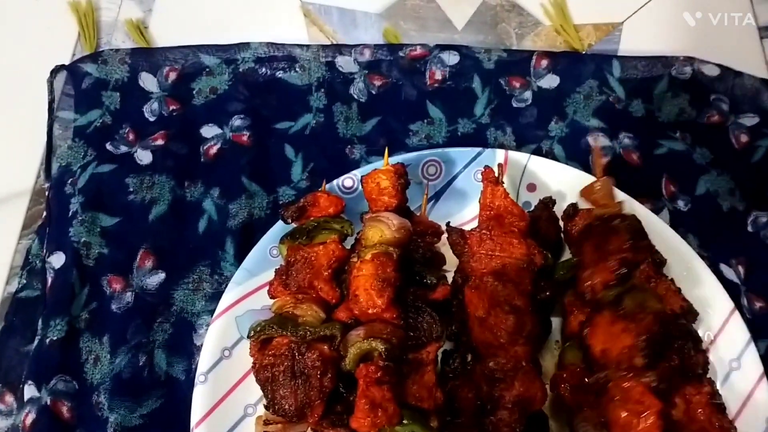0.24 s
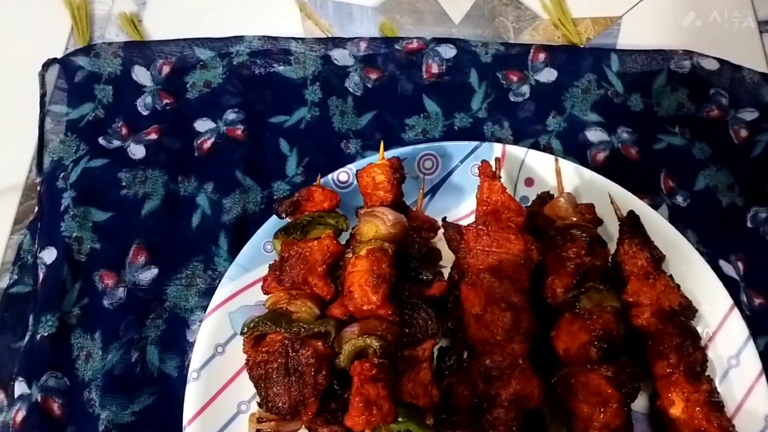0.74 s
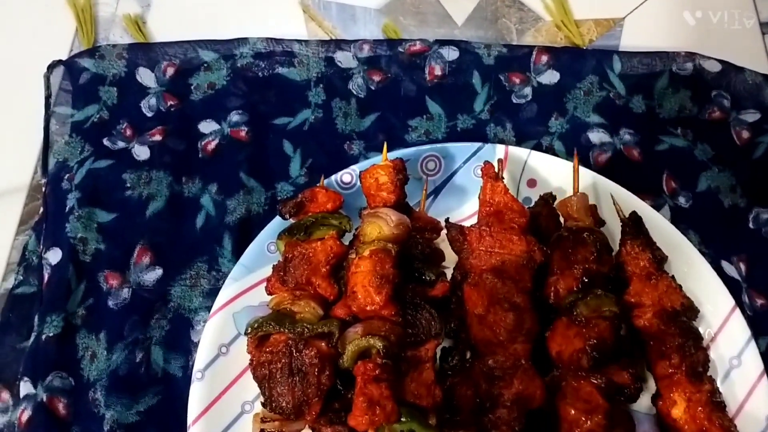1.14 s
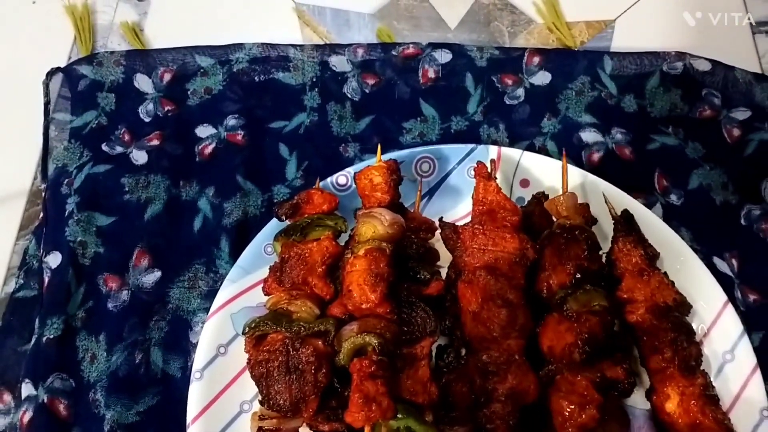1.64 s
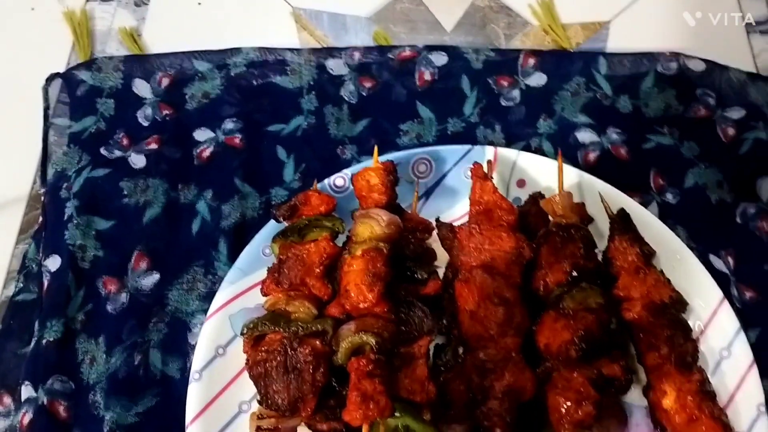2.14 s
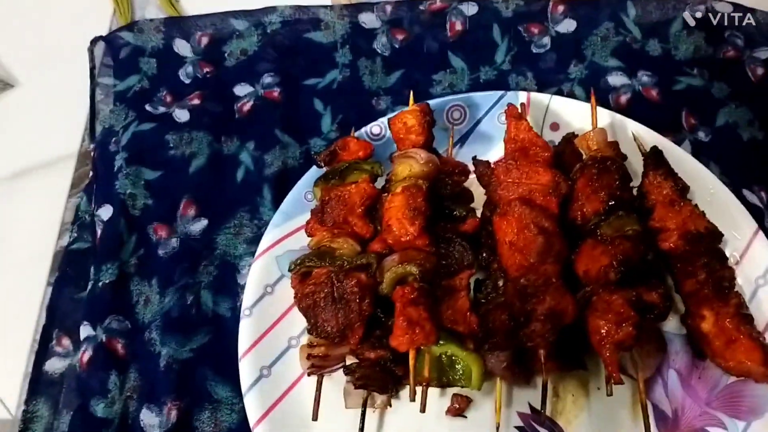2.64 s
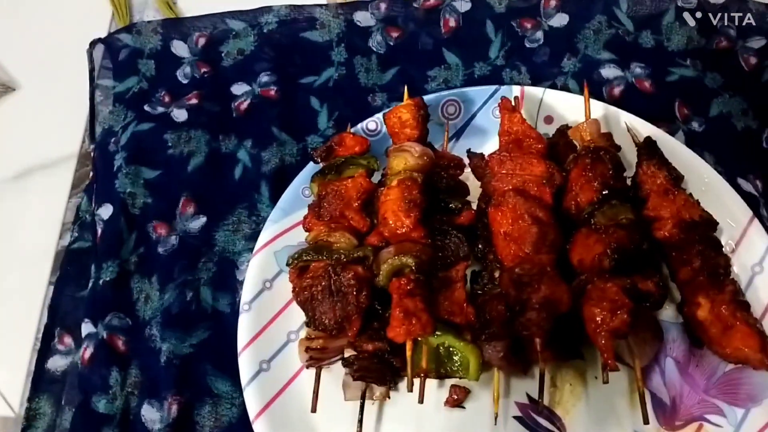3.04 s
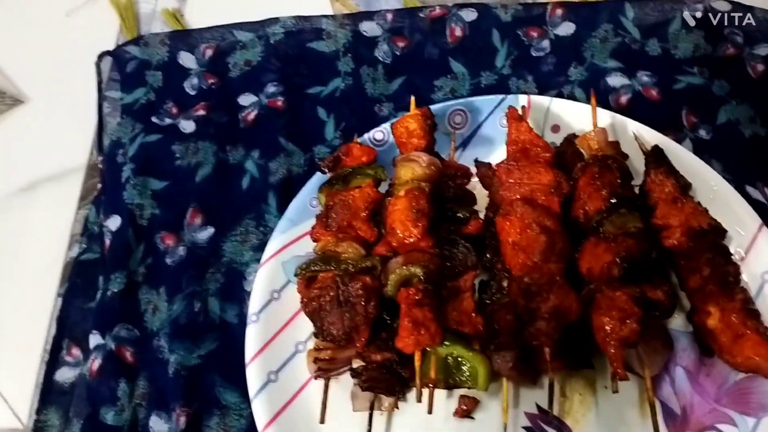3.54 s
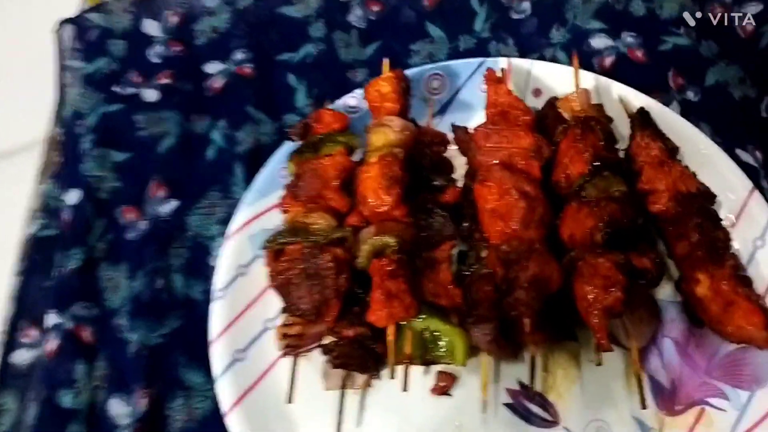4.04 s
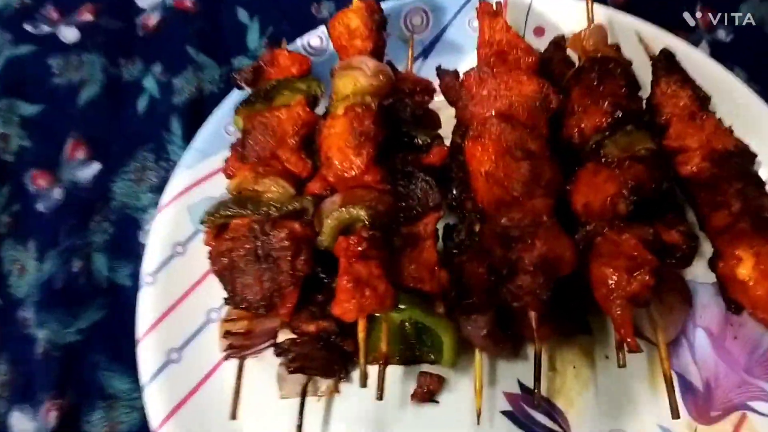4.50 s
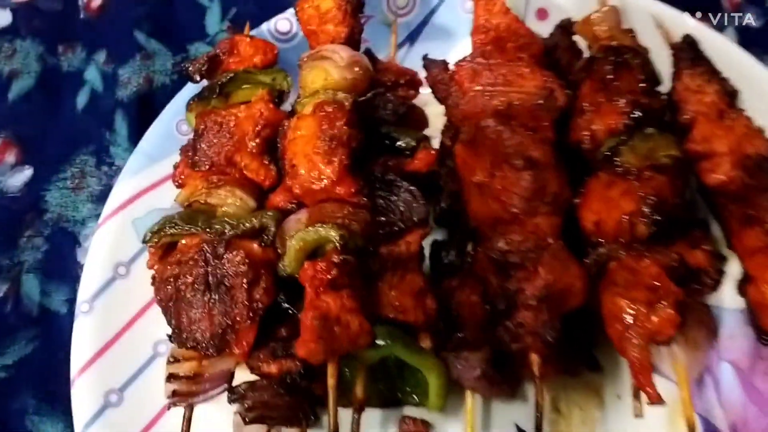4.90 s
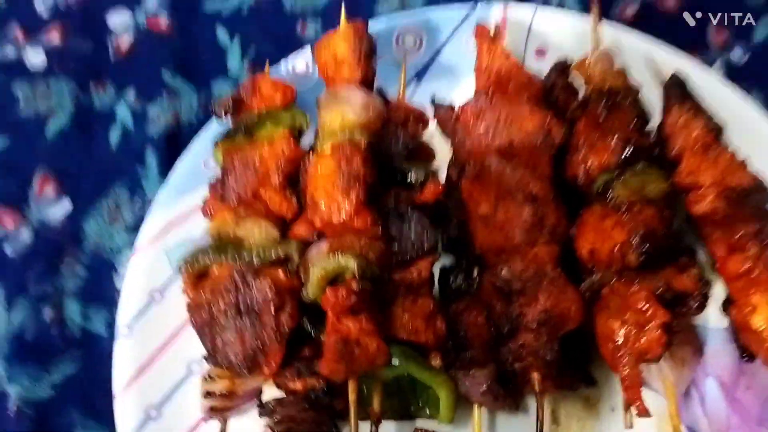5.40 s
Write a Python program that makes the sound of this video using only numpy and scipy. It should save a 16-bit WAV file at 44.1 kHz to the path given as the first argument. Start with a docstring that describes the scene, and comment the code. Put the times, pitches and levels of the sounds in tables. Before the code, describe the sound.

For about 5.7 seconds an electric fan runs in a room. Its motor gives a steady hum of many close tones, beating about thirteen times a second, with a broad soft rush of air and a faint treble hiss. The draught buffets the microphone in short, low, irregular thumps: light at first, hard near 0.9, 1.2 and 1.6 seconds, again around 2.2 and 2.7, fluttering near 3.1, then a dense, strongest rumble from 3.75 to 4.3. Afterwards it is calmer, with one weaker puff near 4.65. Faint bright ticks with short dying tails are scattered throughout, clearer near 1.8, 2.3, 3.75 and 4.15, over even fainter ticking with each turn. A sharp, tiny double snap comes at 1.5 seconds. From about 4.7 the hum recedes markedly, while the air softens only slightly. The plate of skewered food makes no audible sizzle.

```python
"""An electric fan runs in a room: its motor hums as a sum of sines that beat into one throb per shaft turn.
Its blades push a broad rush of air and a treble hiss, both noises of shaped spectrum with fluctuating level.
Its draught buffets the microphone in low, irregular puffs, made of short sine swings and low noise.
Faint bright ticks, bursts of treble noise, die away nearby, and one sharp double snap is heard."""
import sys
import numpy as np
from scipy import signal
from scipy.fft import rfft, irfft
from scipy.io import wavfile
from scipy.ndimage import uniform_filter1d

SR = 44100
rng = np.random.default_rng(int(sys.argv[2]) if len(sys.argv) > 2 else 0)


def voltage_ratio(level):
    """Linear amplitude factor for a level in decibels (scalar or array-like)."""
    return 10 ** (np.asarray(level, float) / 20)


def store_pcm(level_fs):
    """Save levels as 16-bit WAV."""
    pcm = np.round(np.clip(level_fs, -1, 1) * 32767).astype(np.int16)
    wavfile.write(sys.argv[1], SR, np.atleast_2d(pcm).T)


N = 249586

# Levels in the tables hold before the random fluctuations and filters; spectra are relative, per Hz.
# Motor tones, {multiple of twice the mains: [(shaft order, rms level/dB)]};
# pitch = order * shaft frequency + multiple * twice the mains frequency
MOTOR_TONES = {-1: [(90, -58)], 0: [(41, -62), (43, -57), (45, -52), (47, -60), (51, -55), (53, -53),
               (54, -53), (56, -60), (89, -53), (90, -59), (91, -59), (92, -60), (94, -61)], 1: [(44, -53),
               (45, -43), (46, -46), (47, -50), (49, -55), (88, -61), (89, -53), (90, -55), (91, -62),
               (93, -61)], 2: [(41, -59), (42, -56), (43, -53), (44, -56), (45, -49), (47, -62), (89, -59),
               (90, -61), (91, -59), (92, -60)], 3: [(44, -54), (45, -62), (48, -59)], 4: [(46, -62),
               (92, -61)]}
# The hum fades as the microphone turns away: (t/s, level change/dB)
HUM_FADE = [(0, -0.5), (1, -1), (2, 1.5), (3.7, -0.5), (4.7, -0.5), (4.95, -3.5), (5.66, -10.5)]
# How much of the fan's air noise reaches the microphone: (t/s, rush level/dB, hiss level/dB)
FAN_AIR_LEVELS = [(0.0, -35.5, -53.5), (0.36, -36.5, -54), (2.82, -36, -53), (3.62, -36.5, -54.5),
                  (3.97, -34.5, -53.5), (4.44, -36, -55), (5.23, -38, -56.5), (5.66, -37.5, -58)]
# Spectrum of the air rush and room noise: (f/Hz, level/dB)
RUSH_SPECTRUM = [(35, -1.5), (90, -15.5), (240, -4), (450, -15), (560, -4.5), (700, -6), (810, -7),
                 (940, -6), (1090, -7.5), (1380, -7), (1440, -11), (1900, -10.5), (2750, -15.5),
                 (3300, -20), (3750, -27.5), (4200, -46), (8000, -60)]
# Spectrum of the treble hiss: (f/Hz, level/dB)
HISS_SPECTRUM = [(2000, -7), (4000, 1.5), (6300, -0.5), (7500, 3.5), (8800, -2.5), (10500, -8.5),
                 (12200, -8.5), (14000, -5.5), (15600, -1), (17000, -7.5)]
# Strength of the draught between the strong puffs: (t/s, level/dB)
GUST_LEVELS = [(0, -48), (.5, -43.5), (.68, -53), (.82, -35.5), (1.4, -46.5), (1.75, -36.5), (2.0, -39),
               (2.38, -44.5), (2.6, -34.5), (2.9, -40.5), (3.15, -26.5), (3.32, -45), (3.68, -41),
               (3.85, -36), (4.08, -34), (4.44, -51.5), (4.85, -45.5), (5.66, -49.5)]
# Strong puffs of draught: (t/s, peak level/dB, centre f/Hz, length/ms)
STRONG_PUFFS = [(0.091, -24, 188, 4.2), (0.255, -32, 123, 18), (0.343, -21.5, 145, 11.4),
                (0.445, -26, 142, 5.8), (0.759, -24, 156, 9.1), (0.799, -19.5, 149, 6.7),
                (0.878, -6.5, 201, 5.7), (0.898, -11.5, 215, 9.3), (1.069, -20, 125, 11),
                (1.233, -8.5, 150, 7.6), (1.316, -23.5, 108, 12), (1.538, -22.5, 129, 10),
                (1.59, -9, 124, 13.5), (1.656, -23, 150, 8.3), (1.811, -16.5, 149, 7.6),
                (1.85, -15.5, 137, 10), (1.875, -18.5, 159, 7.4), (1.902, -18, 120, 17),
                (2.0, -24.5, 180, 20), (2.042, -22.5, 168, 20), (2.138, -17.5, 180, 6.9),
                (2.157, -9.5, 156, 6.5), (2.218, -21.5, 159, 18), (2.481, -22, 152, 9.5),
                (2.553, -18.5, 132, 11), (2.608, -20, 180, 11), (2.665, -11, 161, 5.2),
                (2.716, -8, 153, 6.2), (2.815, -14, 148, 6.4), (2.84, -21, 131, 13), (2.999, -27, 144, 13),
                (3.049, -13, 177, 6.4), (3.1, -12.5, 215, 6.5), (3.13, -20, 150, 26), (3.178, -22, 125, 21),
                (3.071, -19.5, 150, 16), (3.255, -17.5, 136, 5.1), (3.41, -26, 116, 9.2),
                (3.556, -18.5, 147, 13), (3.758, -18, 196, 23), (3.787, -12, 274, 3.6),
                (3.808, -10, 195, 10), (3.835, -8, 186, 9.2), (3.862, -4.5, 147, 17.4),
                (3.895, -13.5, 145, 25), (3.935, -16, 157, 25), (4.039, -11, 165, 10.5),
                (4.075, -17.5, 197, 27), (4.11, -11, 165, 11), (4.195, -16.5, 171, 18),
                (4.25, -28, 131, 15), (4.284, -17, 129, 15), (4.36, -32, 127, 11), (4.648, -19, 165, 16)]
# Spectrum of the draught's noise at the microphone port: (f/Hz, level/dB)
DRAUGHT_SPECTRUM = [(15, -75), (25, -91), (88, 6), (130, 7.5), (299, -8), (384, -22.5), (515, -17),
                    (700, -66)]
# Spectrum of the ragged upper edge of a puff: (f/Hz, level/dB)
TEARING_SPECTRUM = [(100, -21), (200, 0.5), (300, 1.5), (420, -9), (520, -14.5), (650, -38)]
# Bright ticks: (t/s, nominal peak level/dB)
BRIGHT_TICKS = [(0.3536, -42), (0.43, -41), (0.5761, -43.5), (0.7357, -44), (1.1852, -45.5), (1.4356, -45),
                (1.5134, -40.5), (1.5923, -43.5), (1.812, -36), (2.2882, -39), (2.5122, -46),
                (2.811, -42.5), (3.2181, -45), (3.3712, -39.5), (3.5214, -42.5), (3.7499, -37),
                (4.149, -38), (4.2258, -43), (5.458, -41.5)]
# Spectrum of the burst of a tick: (f/Hz, level/dB)
TICK_SPECTRUM = [(3000, -35), (6500, -11), (7600, -2.5), (8500, -1), (9600, -5), (11000, -5), (12500, -19),
                 (16000, -11)]
# Spectrum of the narrower, duller tail that lingers in the room: (f/Hz, level/dB)
TAIL_SPECTRUM = [(5500, -42), (6800, -21), (7600, -4), (8500, -1), (9500, -9), (11500, -30)]
# The two clicks of the snap: (t/s, nominal peak level/dB, nominal f/Hz, width of pitch scatter/Hz)
SNAP_CLICKS = [(1.4998, -33, 8800, 9000), (1.5048, -30.5, 7460, 1200)]

SHAFT_HZ, MAINS_TWICE_HZ, SHAFT_START_RAD = 12.9107, 100.14, -2.3
# weak eddies: number, level over the gust, and exponential scale of the excess
WEAK_EDDIES, WEAK_OVER_GUST_DB, WEAK_SPREAD_DB = 140, 6.5, 2
WEAK_SHORTEST_MS, WEAK_LONGEST_MS, WEAK_HZ_AT_10_MS, WEAK_HZ_POWER = 3.3, 17.5, 150, -0.58
# an eddy arrives faster than it leaves, and its swing slows as it passes
RISE_SHARE, PHASE_SAG_PER_S, EDDY_TOP_HZ = 0.39, 9.1, 540
# the tick of each shaft turn: first delay, random window, weakest level and the range above it
TURN_TICK_START_S, TURN_TICK_WINDOW_S, TURN_TICK_DB, TURN_TICK_RANGE_DB = 0.019, 0.021, -56.5, 10
TICK_RISE_S, TICK_BODY_DB = 0.0031, -9   # swell time constant; burst level relative to the nominal peak
PORT_CUT_HZ, TOP_HZ = 68, 15850


def curves(rows):
    """Linear interpolation: turns the columns of a table into functions of time."""
    s, *columns = np.transpose(rows)
    return [np.interp(np.arange(N) / SR, s, column) for column in columns]


def coloured_noise(spectrum, ripple_db=0, ripple_hz=30):
    """Spectral shaping: white noise filtered to rms 1, rippled by many small room resonances."""
    hz, db = np.transpose(spectrum)
    grid = np.fft.rfftfreq(N, 1 / SR)
    knots = np.arange(0, SR / 2 + ripple_hz, ripple_hz)
    shape_db = np.interp(np.log(np.maximum(grid, 1)), np.log(hz), db)
    shape_db += ripple_db * np.interp(grid, knots, rng.standard_normal(len(knots)))
    noise = irfft(rfft(rng.standard_normal(N)) * voltage_ratio(shape_db), N)
    return noise / np.std(noise)


def drift(rate_hz):
    """Random fluctuation: white noise twice through a one-pole low-pass, scaled to standard deviation 1."""
    pole = np.exp(-2 * np.pi * rate_hz / SR)
    # one extra second lets the filter settle
    slow = signal.lfilter([1], [1, -2 * pole, pole * pole], rng.standard_normal(N + SR))[SR:]
    return slow / np.std(slow)


def motor_hum(change_db, waver_db, rough_db):
    """Beating: sines tied to the shaft angle, whose neighbouring orders beat into one throb per turn."""
    t = np.arange(N) / SR
    hum = np.zeros(N)
    shaft_angle = 2 * np.pi * SHAFT_HZ * t + SHAFT_START_RAD
    for multiple, tones in MOTOR_TONES.items():
        mains_angle = multiple * 2 * np.pi * MAINS_TWICE_HZ * t
        for order, level_db in tones:
            # room paths scatter the phase of the weaker tones, so the throb stays round
            scatter = rng.uniform(-np.pi, np.pi) * np.clip((-level_db - 50) / 6, 0, 1)
            angle = order * shaft_angle + mains_angle + scatter
            tone_db = level_db + waver_db * drift(0.35) + rough_db * drift(2.6)
            hum += np.sqrt(2) * voltage_ratio(tone_db) * np.cos(angle)
    return voltage_ratio(change_db) * hum


def blade_air(rush_db, hiss_db):
    """Broadband flow noise: a rush and a treble hiss whose levels flutter partly together."""
    flutter = drift(31)
    rush_db = rush_db + 0.79 * flutter + 0.48 * drift(6)
    hiss_db = hiss_db + 0.71 * flutter + 0.45 * drift(30)
    rush = voltage_ratio(rush_db) * coloured_noise(RUSH_SPECTRUM, ripple_db=2, ripple_hz=20)
    hiss = voltage_ratio(hiss_db) * coloured_noise(HISS_SPECTRUM, ripple_db=1.7, ripple_hz=40.34)
    return rush + hiss


def weak_eddies(gust_db):
    """Random turbulence: eddies drawn by chance, sized by the gust; short ones swing faster."""
    when, size, length = rng.uniform(0, 1, (WEAK_EDDIES, 3)).T
    ms = WEAK_SHORTEST_MS + (WEAK_LONGEST_MS - WEAK_SHORTEST_MS) * length
    excess_db = WEAK_OVER_GUST_DB - WEAK_SPREAD_DB * np.log(1 - 0.95 * size)
    peak_db = gust_db[(when * N).astype(int)] + excess_db
    hz = WEAK_HZ_AT_10_MS * (ms / 10) ** WEAK_HZ_POWER
    return list(zip(when * N / SR, peak_db, hz, ms))


def draught(level_db, wake_db, tearing_db, tearing_power, speed_power):
    """Turbulence at the microphone port: lumpy low noise plus eddies that burst as short low swings."""
    t = np.arange(N) / SR
    swings, strength, edge = np.zeros((3, N))
    eddies = weak_eddies(level_db) + STRONG_PUFFS
    turns = rng.uniform(0, 1, len(eddies))   # random starting phases
    for (s, peak_db, hz, ms), turn in zip(eddies, turns):
        near = slice(max(round((s - 0.06) * SR), 0), round((s + 0.06) * SR))
        age = t[near] - s
        # lopsided Gaussian: the length is its full width at half height
        stretch = 2 * np.where(age < 0, RISE_SHARE, 1 - RISE_SHARE)
        swell = voltage_ratio(peak_db) * np.exp(-4 * np.log(2) * (1000 * age / (ms * stretch)) ** 2)
        swings[near] += swell * np.cos(2 * np.pi * (hz * age * (1 - PHASE_SAG_PER_S * age) + turn))
        strength[near] += swell
        edge[near] += swell * (hz / 170) ** speed_power   # faster eddies have more edge
    # each eddy trails a noisy wake that joins close puffs into one rumble
    wake = np.abs(uniform_filter1d(uniform_filter1d(strength, size=900), size=900))
    rumble_gain = voltage_ratio(level_db + 3.5 * drift(12)) + voltage_ratio(wake_db) * wake
    rumble = rumble_gain * coloured_noise(DRAUGHT_SPECTRUM)
    # stronger eddies tear more: their ragged edge grows faster than their swing
    edge = np.abs(uniform_filter1d(edge, size=500))
    tearing = voltage_ratio(tearing_db) * edge ** tearing_power * coloured_noise(TEARING_SPECTRUM)
    low_pass = signal.butter(6, EDDY_TOP_HZ, fs=SR, output="sos")
    return signal.sosfilt(low_pass, swings + rumble + tearing)


def turn_ticks():
    """Periodic excitation: something ticks faintly once per turn of the shaft, never quite alike."""
    turns = np.arange(0, N / SR, 1 / SHAFT_HZ)
    late, size = rng.uniform(0, 1, (len(turns), 2)).T
    when = turns + TURN_TICK_START_S + TURN_TICK_WINDOW_S * late
    return list(zip(when, TURN_TICK_DB + TURN_TICK_RANGE_DB * size))


def ticks(t60, tail_t60, tail_db, grain_db):
    """Exponential decay: grainy bursts of bright noise swell quickly, then a duller tail dies in the room."""
    power = np.zeros(N + SR)
    for s, peak_db in BRIGHT_TICKS + turn_ticks():
        power[round(s * SR)] += voltage_ratio(2 * peak_db)
    keep = np.exp(-1 / (TICK_RISE_S * SR))
    power = signal.lfilter([1 - keep], [1, -keep], power[:N] + 1e-18)
    out = np.zeros(N)
    burst = (t60, TICK_BODY_DB, TICK_SPECTRUM)
    tail = (tail_t60, tail_db, TAIL_SPECTRUM)
    for fade_s, level_db, spectrum in (burst, tail):
        dying = signal.lfilter([1], [1, -voltage_ratio(-120 / (fade_s * SR))], power)   # power falls 60 dB in fade_s
        grain = voltage_ratio(level_db + grain_db * drift(40))
        out += np.sqrt(dying) * grain * coloured_noise(spectrum, ripple_db=-1.5, ripple_hz=150)
    return out


def snap():
    """Damped oscillation: two clicks, each ringing briefly in its own band by random frequency modulation."""
    out = np.zeros(N)
    age = np.arange(400) / SR
    for s, peak_db, hz, width_hz in SNAP_CLICKS:
        pitch_hz = hz + width_hz * rng.uniform(-0.69, 0.5, len(age))
        ring = np.exp(-age * 450) * np.cos(2 * np.pi * np.cumsum(pitch_hz) / SR)
        start = round(s * SR)
        out[start:start + len(age)] += voltage_ratio(peak_db) * ring
    return out


def scene():
    """Superposition: hum, rush and hiss from across the room, the draught at the port, ticks and a snap."""
    sound = motor_hum(*curves(HUM_FADE), waver_db=1.3, rough_db=2.36)
    sound += blade_air(*curves(FAN_AIR_LEVELS))
    sound += draught(*curves(GUST_LEVELS), wake_db=-8.0, tearing_db=-3.5, tearing_power=1.48, speed_power=3.3)
    sound += ticks(t60=0.14, tail_t60=0.58, tail_db=-14.5, grain_db=2.5)
    sound += snap()
    return sound[None]   # one channel


def band_limit(x):
    """A steep low-pass at the top of the band."""
    return signal.sosfilt(signal.butter(12, 16990, fs=SR, output="sos"), x)


def record(dry):
    """Band limiting: a small microphone loses the deepest bass, and a steep filter cuts the top."""
    bass_cut = signal.butter(4, PORT_CUT_HZ, "high", fs=SR, output="sos")
    top_cut = signal.ellip(12, 0.5, 70, TOP_HZ, fs=SR, output="sos")   # 0.5 dB ripple, 70 dB stop band
    port = signal.sosfilt(bass_cut, dry)
    mix = signal.sosfilt(top_cut, port)
    return band_limit(mix)


dry = scene()
out = record(dry)
store_pcm(out)
```